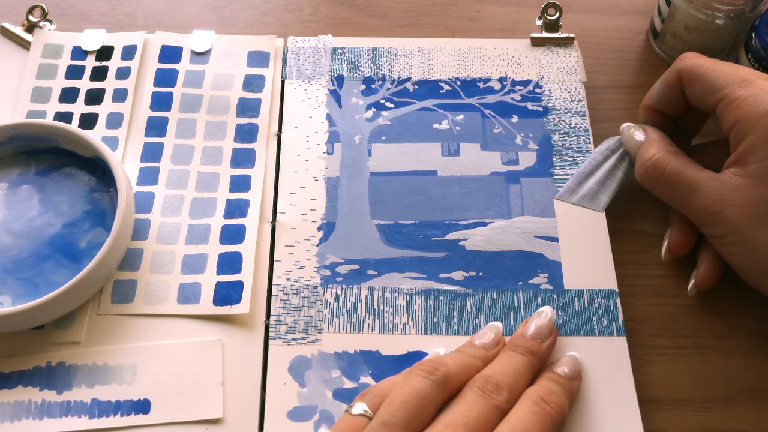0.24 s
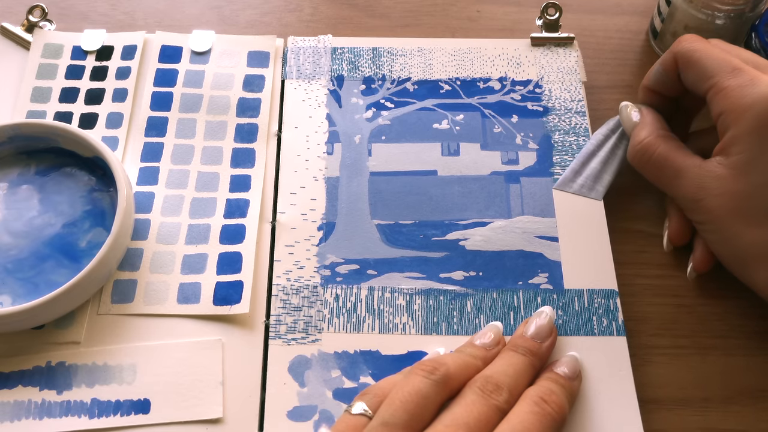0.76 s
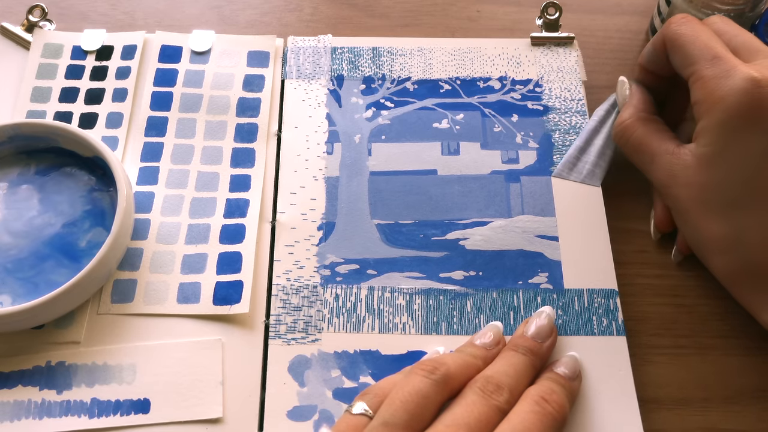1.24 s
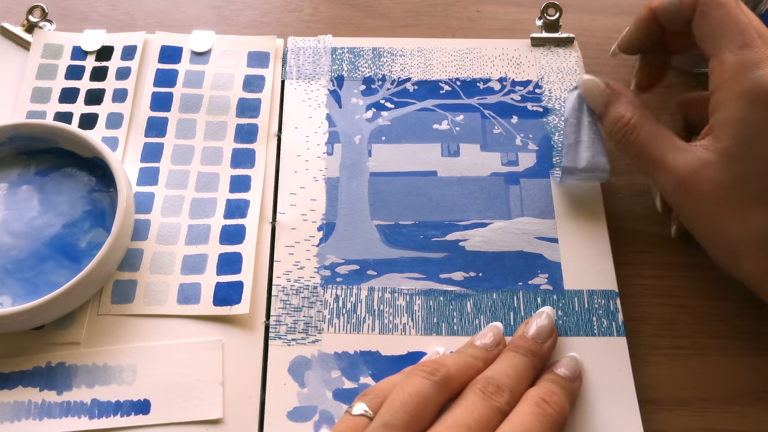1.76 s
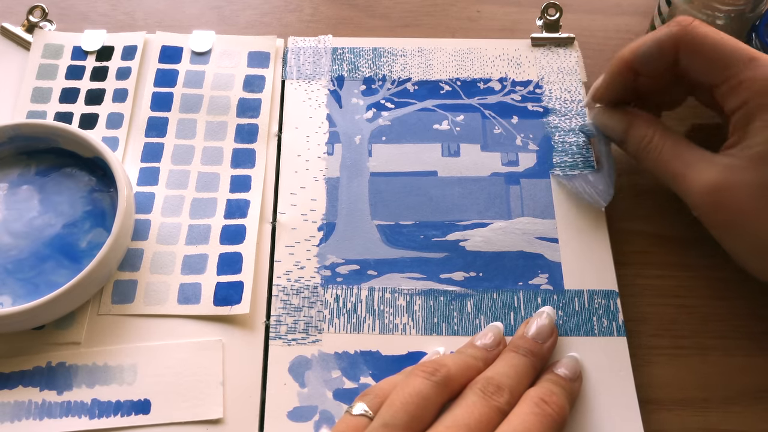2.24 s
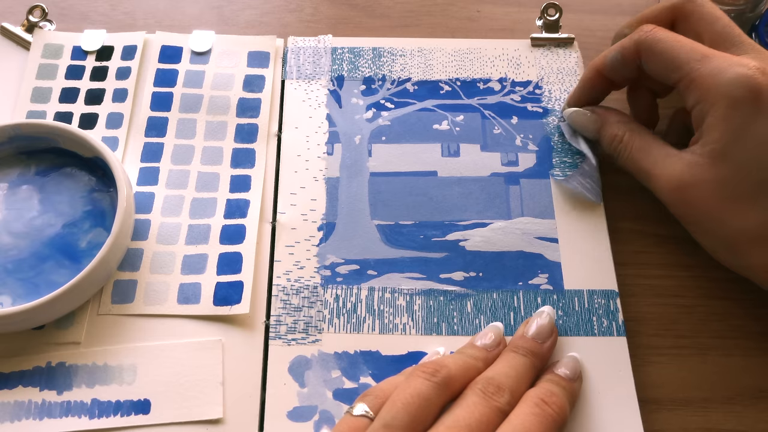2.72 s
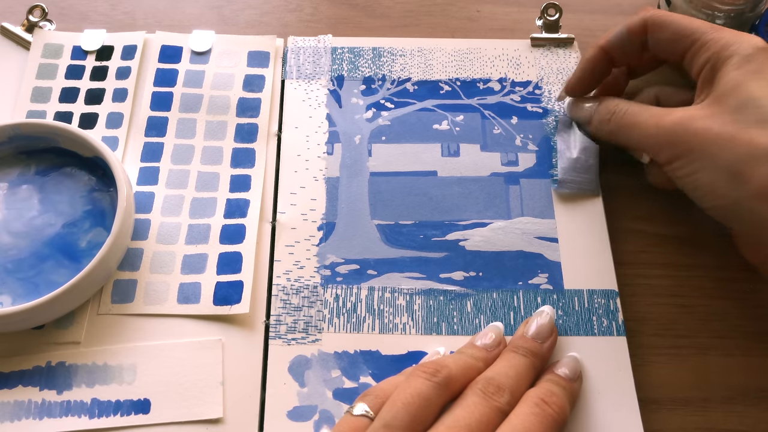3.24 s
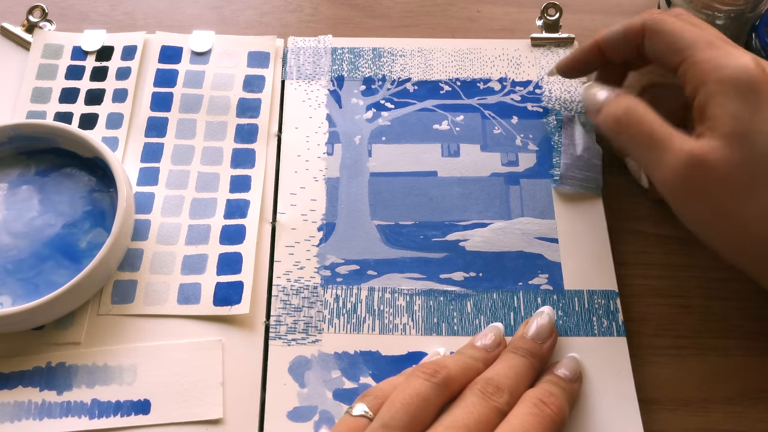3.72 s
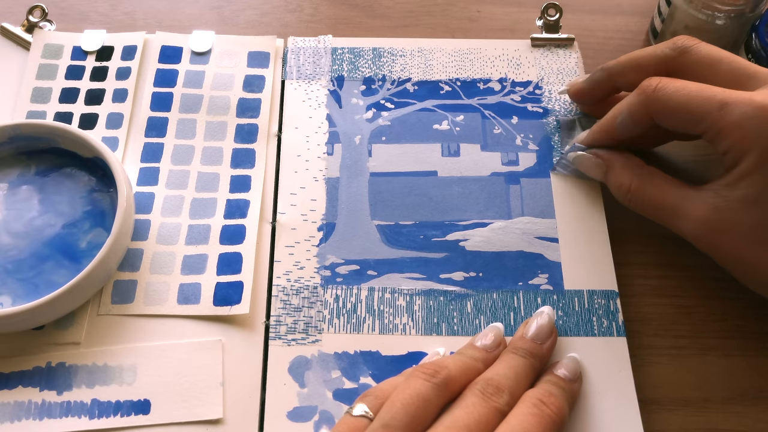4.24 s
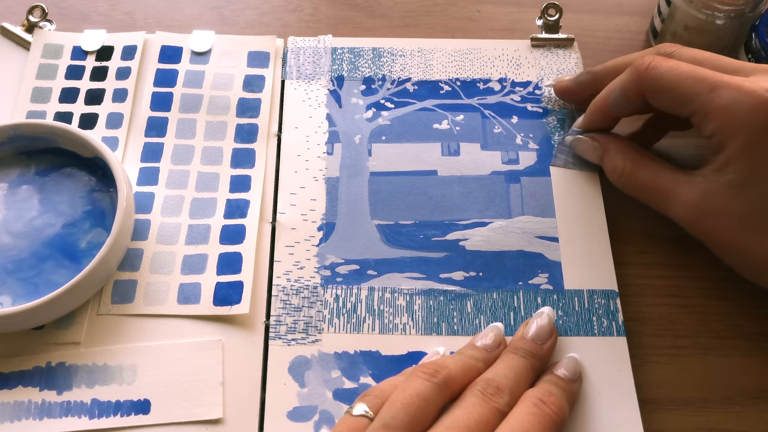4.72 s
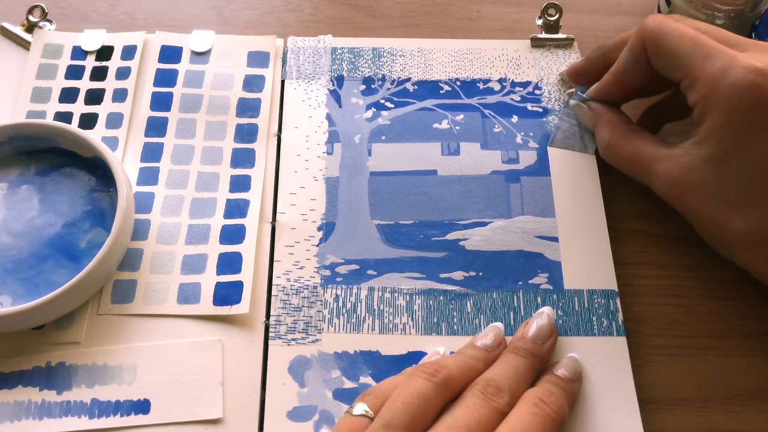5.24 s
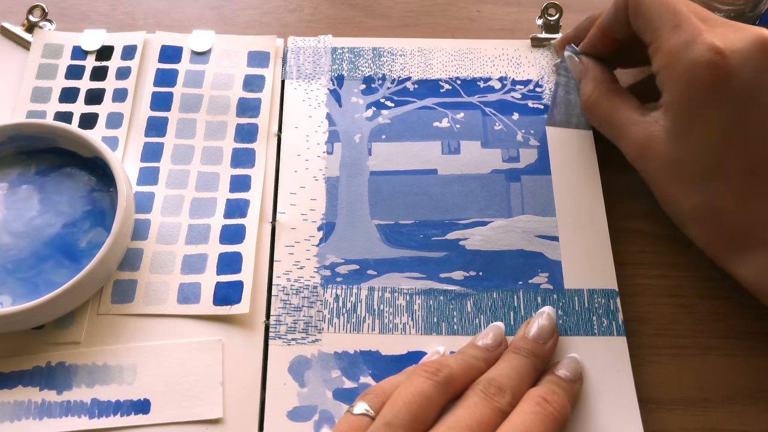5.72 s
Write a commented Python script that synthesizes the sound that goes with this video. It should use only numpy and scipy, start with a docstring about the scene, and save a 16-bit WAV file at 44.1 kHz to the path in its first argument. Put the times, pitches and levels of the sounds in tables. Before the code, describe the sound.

Close up in a small, quiet room, tape lifts gently from a paper page in tiny sticky snaps. Fingertips then rub and crease the free strip, which rustles and clicks, a few snaps standing out loudly among soft thuds of the book on the desk. Finally the peeling resumes, faster and louder, its tone sinking as the strip lengthens over a faint rumble.

```python
"""A small room, close up: masking tape is peeled slowly off a sketchbook page.
The glue lets go in dense tiny snaps that sound through the page and the free strip.
Between two pulls the fingers fold the loose end, which rustles and clicks.
The hands bump the book softly, over a low room rumble."""
import sys
import numpy as np
from scipy import signal
from scipy.fft import rfft, irfft, next_fast_len
from scipy.io import wavfile
from scipy.ndimage import map_coordinates

SR = 44100
rng = np.random.default_rng(int(sys.argv[2]) if len(sys.argv) > 2 else 0)


def unload_wav(signal):
    """Save mono or channel-first audio to the path in sys.argv[1] as 16-bit WAV at rate SR, clipped to [-1, 1]."""
    wavfile.write(
        sys.argv[1],
        SR,
        np.round(np.clip(np.atleast_2d(signal).T, -1, 1) * 32767).astype(np.int16),
    )


N = 263718

# Fingers slide over the loose tape.
# Each row: peak time in seconds, fade in seconds, level in dB, brightness in dB, resonance in Hz.
FINGER_RUBS = [(1.675, 0.038, -52.5, -17, 3000), (1.735, .04, -53, 1, 12000), (1.781, 0.092, -47, 1, 9000),
               (2.145, .07, -48, 6, 12000), (2.324, 0.024, -49.5, 2, 10000), (2.535, .08, -54.5, 2, 6000),
               (2.721, .07, -44, 5, 5800), (3.0, 0.16, -50, -0.5, 7000), (3.061, 0.088, -50, 8.5, 7200),
               (3.209, .3, -42, -1, 7450), (3.35, 0.072, -47, 2.5, 6760), (3.46, 0.034, -47.5, 0, 6500),
               (3.6, .12, -41, 3.5, 5640), (3.785, 0.059, -43.5, -5, 5500), (3.96, 0.032, -38.5, -6, 8300),
               (4.005, .11, -39, 0.5, 8400), (4.12, 0.076, -46.5, 2, 9000), (4.26, .12, -35.5, 3, 7200),
               (4.32, .25, -46.5, 8, 7300), (5.17, 0.16, -39.5, 2, 10000)]


def amp(db):
    """Decibels to gain."""
    return 10 ** (np.asarray(db) / 20)


def unit(x):
    """x at rms 1."""
    return x / np.sqrt(np.mean(x ** 2) + 1e-20)


def along(points, hz):
    """(Hz, value) points read on a log axis."""
    f, v = np.transpose(points)
    return np.interp(np.log(hz + 1), np.log(f + 1), v)


def curves(rows):
    """One value per sample for each column after the time."""
    s, *columns = np.transpose(rows)
    return [np.interp(np.arange(N) / SR, s, column) for column in columns]


def wobble(rate_hz):
    """Smooth random curve, rate_hz knots a second."""
    knots = rng.standard_normal(int(N * rate_hz / SR) + 4)
    return map_coordinates(knots, [np.arange(N) * rate_hz / SR])


def filtered(x, response):
    """x through a frequency response."""
    m = next_fast_len(N + 8192)
    return irfft(rfft(x, m) * response(np.fft.rfftfreq(m, 1 / SR)), m)[:N]


def noise(colour):
    """Coloured noise of rms 1."""
    return unit(filtered(rng.standard_normal(N), lambda hz: amp(along(colour, hz))))


def causal(gain):
    """Minimum-phase pulse with this magnitude spectrum."""
    cepstrum = irfft(np.log(gain + 1e-6))
    half = len(cepstrum) // 2
    return irfft(np.exp(rfft(np.r_[cepstrum[0], 2 * cepstrum[1:half], np.zeros(half)])))


def add(track, start_s, sound):
    """Mix a sound into the track."""
    part = track[max(0, round(start_s * SR)):][:len(sound)]
    part += sound[:len(part)]


def background():
    """Low rumble, faint hum and hiss of the room."""
    # Spectra. Each row: frequency in Hz, relative level in dB.
    rumble_colour = [(8.8, -27), (15, 2.5), (86, 0.5), (110, -2.5), (170, -17.5), (220, -63), (370, -120)]
    air_colour = [(71, -37), (120, 0), (250, -5.5), (347, -10), (452, -6), (554, -11), (626, -5),
                  (800, -20), (922, -12), (1060, -14), (1200, -16), (1670, -19), (15700, -27)]
    # Each row: time in seconds, level in dB about which the rumble swings.
    rumble_level = [(0, -48.5), (0.6, -49), (0.75, -41.5), (1.15, -47), (2.2, -49.5), (3.7, -47.5),
                    (3.92, -44), (4.5, -51.5), (5.98, -43.5)]
    # Each row: frequency in Hz, rms level in dB.
    hum_tones = [(49, -58), (240, -63.5), (318, -66)]
    t = np.arange(N) / SR
    rumble = amp(curves(rumble_level)[0] + 1.5 * wobble(5.7)) * noise(rumble_colour)
    hum = sum(amp(db) * np.sqrt(2) * np.sin(2 * np.pi * hz * t + 0.82 * wobble(6))
              for hz, db in hum_tones)
    return rumble + hum + amp(-52.5) * noise(air_colour)


def room(x, tail_db):
    """Near surfaces answer first, then a short diffuse tail."""
    # Each row: delay in seconds, gain in dB.
    reflections = [(.0074, -24.5), (.0096, -19), (0.019, -26.5)]
    # Each row: frequency in Hz, T60 in seconds.
    decay = [(150, 0.13), (1500, 0.61), (6500, 0.58), (15000, 0.16)]
    hz, t, z = signal.stft(rng.standard_normal(SR // 2), SR, nperseg=256)
    envelope = amp(-60 * t / along(decay, hz)[:, None]) * (1 - np.exp(-t / .004))
    tail = signal.istft(z * envelope, SR, nperseg=256)[1]
    response = amp(tail_db) * tail / np.linalg.norm(tail)
    for delay_s, db in reflections:
        add(response, delay_s, amp([db]))
    return x + signal.fftconvolve(x, response)[:N]


def bumps(t60_cycles=11, rise_s=0.0013):
    """The bumped book thuds on the desk; a fingertip knock rings all its modes."""
    # Each row: start in seconds, level in dB, frequency in Hz.
    thuds = [(0.733, -31.5, 62), (.775, -35, 85.5), (0.899, -34, 100), (1.793, -31.5, 83),
             (2.81, -29.5, 116), (3.89, -28.5, 65), (5.645, -29, 190), (5.674, -29.5, 208),
             (5.706, -24.5, 200)]
    # Each row: start in seconds, level in dB.
    knocks = [(1.669, -30), (3.214, -40), (3.956, -30), (4.265, -21), (5.242, -29.5), (5.92, -28.5)]
    # Each row: frequency in Hz, gain in dB.
    book_modes = [(95, -7), (230, -7.5), (360, 0.5), (700, -4)]
    track, t = np.zeros(N), np.arange(SR // 4) / SR
    knocked = [(s, db + mode_db, hz) for s, db in knocks for hz, mode_db in book_modes]
    for s, db, hz in thuds + knocked:
        envelope = amp(db - 60 * t * hz / t60_cycles) * (1 - np.exp(-t / rise_s))
        add(track, s, envelope * np.sin(2 * np.pi * hz * t))
    return track


def dispersed(x, delay_s):
    """Bending waves in paper: lows arrive after highs (delay_s at 1 kHz)."""
    return filtered(x, lambda hz: np.exp(-4j * np.pi * delay_s * np.sqrt(1000 * hz)))


def creases(per_rub=2, centre_hz=7500, spread_db=2.6, spread_octaves=0.65):
    """Each rub sets off small snaps around its peak."""
    rows = []
    for peak_s, fade_s, rub_db, _, _ in FINGER_RUBS:
        for when, size, pitch in rng.standard_normal((per_rub, 3)):
            ring_db, page_db, crack_db = rub_db + spread_db * size + np.array([29, 22, 24])
            ring_hz = centre_hz * 2 ** (spread_octaves * pitch)
            rows.append((peak_s + 0.25 * fade_s * when, ring_db, ring_hz, page_db, crack_db))
    return rows


def snaps(log_width=0.19, ripple_db=2.0, lead_t60_s=0.0059, flutter_t60_s=0.012):
    """The tape buckles or tears free: it cracks, rings briefly and knocks the page."""
    # Each row: time in seconds, ring in dB, ring in Hz, page in dB, crack in dB.
    events = [(0.2162, -15, 3500, -12, -20), (1.439, -11, 3450, -26, -19), (1.67, -14, 1210, -10, -17.5),
              (1.7303, -12, 3300, -15, -10), (1.7745, -13, 6550, -15, -8), (1.7903, 2.5, 3200, 2.5, 2.5),
              (2.052, -17, 5360, -13, -22), (2.1329, -3, 6360, -17, -7), (2.147, -8, 3140, -4, -5),
              (2.319, -11.5, 3200, -20, -10), (2.4102, -3.5, 5600, -14, -24), (2.4758, 5, 5600, -11, -25),
              (2.5695, -14.5, 5990, -13.5, -33), (2.622, -3, 5950, -18, -27),
              (2.6567, -4, 2390, -5.5, -9.5), (2.7567, 4, 1220, 2, -26), (3.213, -2.5, 4700, 2, -1),
              (3.4174, -1.5, 6000, -14, -23), (3.439, -3.5, 1140, -20, -19), (3.4634, -5, 1030, -20, -24),
              (3.572, 9, 5900, 3.5, 7.5), (3.6208, 10.5, 5000, 2, -1), (3.6244, 11, 6300, 4.5, 10),
              (3.782, -9, 5300, -5, -10), (3.9488, -9, 8660, -7, -9), (3.957, -7, 2710, -0.5, -2),
              (4.2647, 19, 7240, 14, 13), (4.2744, 3, 8740, 0, -16), (4.697, -6, 3600, -12, -16),
              (4.9142, -18, 10120, -19, -18), (4.9551, -18, 10720, -19, -18), (5.1072, -18, 9780, -9, -4),
              (5.1664, 16, 4170, -4, 7.5), (5.2152, -3, 10250, -15, -9), (5.219, 5.5, 5250, -13, 0),
              (5.2309, -7, 9650, -8, -2), (5.2411, 10.5, 1600, 1, 0), (5.2645, 5.5, 3950, -15, -3.5)]
    # Spectra of the page and the tape's own crack. Each row: frequency in Hz, gain in dB.
    page_colour = [(60, -7), (300, -3.5), (650, 0), (1080, -9.5), (1550, -1), (2200, -4.5), (3000, -0.5),
                   (4500, -6), (16000, -33)]
    crack_colour = [(500, -31), (3000, -7.5), (7000, -1.5), (10500, -2), (13500, -6), (16000, -12)]
    track = np.zeros(N)
    hz = np.fft.rfftfreq(1024, 1 / SR) + 1
    t = np.arange(-256, 768) / SR
    for s, ring_db, ring_hz, page_db, crack_db in events + creases():
        ring = amp(ring_db) / (1 + (np.log(hz / ring_hz) / log_width) ** 4) ** .5
        page = amp(page_db + along(page_colour, hz))
        crack = amp(crack_db + along(crack_colour, hz))
        # Each crease has its own peaks and notches.
        ripple = map_coordinates(rng.standard_normal(40), [np.sqrt(hz) / 4])
        pulse = causal(np.sqrt(ring ** 2 + page ** 2 + crack ** 2) * amp(ripple_db * ripple))
        # Fibres give just before the snap; the paper shivers after it.
        lead = rng.standard_normal(len(t)) * amp(-60 * abs(t) / lead_t60_s) * (t < 0)
        flutter = rng.standard_normal(len(t)) * amp(-60 * abs(t) / flutter_t60_s) * (t > 0)
        force = (t == 0) + 0.27 * lead / np.linalg.norm(lead) + 0.45 * flutter / np.linalg.norm(flutter)
        add(track, s + t[0], signal.fftconvolve(pulse, force))
    return dispersed(track, delay_s=0.00089)


def grains(per_s, spread_db, blur, jerk_db, jerk_hz):
    """Tiny uneven releases, bunched by stick and slip, over a blur of still smaller ones."""
    sizes = amp(spread_db * np.minimum(rng.standard_normal(N), 2.4))
    impulses = (rng.random(N) < per_s / SR) * sizes * rng.choice([-1, 1], N)
    ticks = unit(dispersed(impulses, delay_s=0.001207))
    return unit((ticks + blur * rng.standard_normal(N)) * amp(jerk_db * wobble(jerk_hz)))


def radiate(drive, levels_db, resonances, colour, log_width, drift_db):
    """Grains sound through the page (low), the free strip (middle) and directly (high fizz)."""
    hz, t, z = signal.stft(drive, SR, nperseg=256)
    f = hz[:, None] + 1
    framed = lambda v: np.interp(t, np.arange(N) / SR, v + np.zeros(N))
    peaks_db = sum(framed(boost_db) / (1 + (np.log(f / framed(centre_hz)) / log_width) ** 2)
                   for centre_hz, boost_db in resonances)
    # Weaker resonances drift as the tape changes shape.
    patch = np.outer(np.hanning(7), np.hanning(90))
    drift = unit(signal.fftconvolve(rng.standard_normal(z.shape), patch, "same"))
    shape = amp(along(colour, f) + peaks_db + drift_db * drift) ** 2
    over_page, over_strip = 1 / (1 + (1200 / f) ** 6), 1 / (1 + (5000 / f) ** 8)
    bands = shape * (1 - over_page), shape * over_page * (1 - over_strip), shape * over_strip
    power = sum(amp(framed(db)) ** 2 * band / band.mean(0) for db, band in zip(levels_db, bands))
    return signal.istft(z * np.sqrt(power), SR, nperseg=256)[1][:N]


def folding(rise_per_fade=0.91, fade_db=20, loose_hz=1800, loose_db=3.5, taut_db=8):
    """Fingertips rustle the crepe paper: rubs swell and fade; brighter ones have more fizz, less page."""
    # Each row: frequency in Hz, relative level in dB.
    colour = [(88, -22), (150, -1.5), (473, 2.5), (740, 1), (1140, -4), (1640, -4), (2120, -6.5),
              (2330, -5), (3940, -6.5), (5380, -6.5), (9100, -11.5), (10800, -9.5), (15700, -14)]
    rustle = grains(per_s=500, spread_db=3.5, blur=1.7, jerk_db=2.5, jerk_hz=100)
    peak_s, fade_s, peak_db, bright_db, hz = np.transpose(FINGER_RUBS)[:, :, None]
    frames = np.arange(0, N, 64)
    smooth = lambda v: np.interp(np.arange(N), frames, v)
    fades = (frames / SR - peak_s) / fade_s
    rub_db = peak_db - fade_db * np.minimum(np.maximum(fades, -fades / rise_per_fade), 10)
    shares_db = -3 - 0.56 * bright_db, 0, bright_db  # page, strip, fizz
    levels_db = [smooth(10 * np.log10(np.sum(amp(rub_db + db) ** 2, axis=0))) for db in shares_db]
    taut_hz = smooth(np.sum(hz * amp(rub_db), axis=0) / np.sum(amp(rub_db), axis=0))
    resonances = [(loose_hz, loose_db), (taut_hz, taut_db)]
    return radiate(rustle, levels_db, resonances, colour, log_width=0.22, drift_db=1.5)


def pull(effort, page_db, strip_db, fizz_db, page_db_per_s, fizz_slope, t60_s):
    """Page, strip and fizz levels in dB follow the effort; the page gains as the pull goes on."""
    effort_db, = curves(effort)
    t, start_s, end_s = np.arange(N) / SR, effort[0][0], effort[-1][0]
    mean_db = np.mean(np.transpose(effort)[1])
    fade_db = -60 * np.maximum(0, np.maximum(start_s - t, t - end_s)) / t60_s
    page = effort_db + page_db + page_db_per_s * (np.clip(t, start_s, end_s) - start_s)
    fizz = mean_db + fizz_db + fizz_slope * (effort_db - mean_db)
    return np.array([page, effort_db + strip_db, fizz]) + fade_db


def peeling():
    """Threads of glue break along the peel line; the second pull is faster and denser."""
    # Each row: time in seconds, effort in dB.
    first_effort = [(0.0, -48), (0.084, -51), (0.224, -47), (0.346, -53.5), (1.018, -44.5), (1.086, -51),
                    (1.294, -46), (1.474, -46.5), (1.62, -55.5)]
    second_effort = [(4.49, -54), (4.7, -42), (4.82, -43.5), (4.96, -53), (5.06, -49.5), (5.18, -38.5),
                     (5.3, -46.5), (5.37, -39), (5.66, -40.5), (5.98, -35.5)]
    # Each row: frequency in Hz, relative level in dB.
    first_colour = [(100, 0), (250, 0), (600, -1), (1100, -4), (1850, -1), (2350, -8.5), (3100, 0.5),
                    (4700, -5), (5600, -3), (6800, -9), (12000, -14), (14200, -17), (16000, -14.5)]
    second_colour = [(71, -30), (120, -3), (166, -8), (208, -4), (260, -9), (313, -6), (565, -15.5),
                     (737, -1.5), (904, -15.5), (1500, -8), (2040, -8.5), (3540, -9.5), (5500, -13),
                     (8010, -16), (15700, -23.5)]
    # The free strip's resonance sinks as it lengthens.
    # Each row: time in seconds, frequency in Hz, boost in dB.
    first_strip = [(0, 3580, 4), (.85, 3620, 4), (1.05, 3400, 0), (1.2, 1950, 5.5)]
    second_strip = [(4.55, 3680, -1), (4.78, 3650, 5), (5.05, 3650, 1), (5.25, 1850, 0), (5.4, 1500, 13),
                    (5.65, 1200, 6), (5.98, 1170, 6)]
    first_taut, second_taut = (12800, 6), (10500, 2.1)  # taut stretch: resonance in Hz, boost in dB
    slow = grains(per_s=1500, spread_db=6.0, blur=1.12, jerk_db=1.35, jerk_hz=110)
    fast = grains(per_s=3000, spread_db=3.5, blur=0.91, jerk_db=1.45, jerk_hz=120)
    gentle = pull(first_effort, page_db=-7, strip_db=-1.0, fizz_db=-3,
                  page_db_per_s=2.5, fizz_slope=1.0, t60_s=0.1)
    firm = pull(second_effort, page_db=-9.5, strip_db=0.1, fizz_db=-1.5,
                page_db_per_s=4.5, fizz_slope=0.76, t60_s=0.081)
    first = radiate(slow, gentle, [curves(first_strip), first_taut], first_colour,
                    log_width=0.11, drift_db=1.03)
    second = radiate(fast, firm, [curves(second_strip), second_taut], second_colour,
                     log_width=0.11, drift_db=2.3)
    return first + second


def scene():
    """All sources reach one spot; a faint side signal with hiss sets the channels apart."""
    # Each row: frequency in Hz, side gain in dB.
    side_colour = [(30, -25), (100, -46), (400, -36), (2000, -80), (5000, -72), (9000, -74), (14000, -48)]
    mono = peeling() + folding() + room(snaps(), tail_db=-18.5) + bumps() + background()
    side = filtered(mono, lambda hz: 1j * amp(along(side_colour, hz)))
    side += amp(-75.5) * rng.standard_normal(N)
    return np.array([mono + side, mono - side])


def record(dry):
    """The hardest snaps overload and clip; a band limit follows."""
    top_hz = 15900
    clipped = np.clip(dry, -1, 1)
    return np.array([filtered(channel, lambda hz: hz < top_hz) for channel in clipped])


dry = scene()
out = record(dry)
unload_wav(out)
```